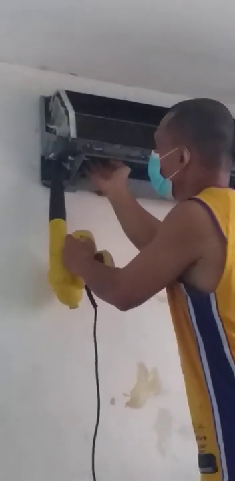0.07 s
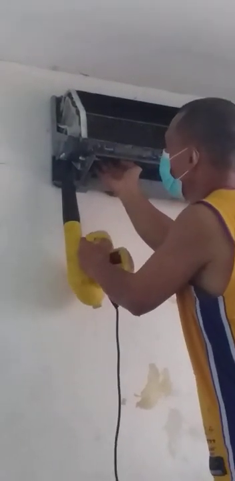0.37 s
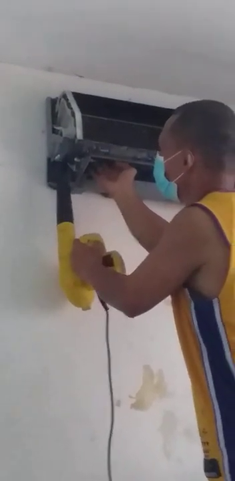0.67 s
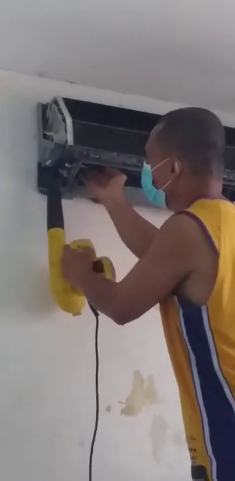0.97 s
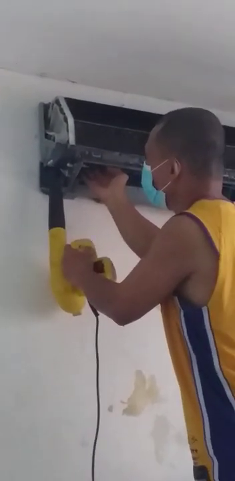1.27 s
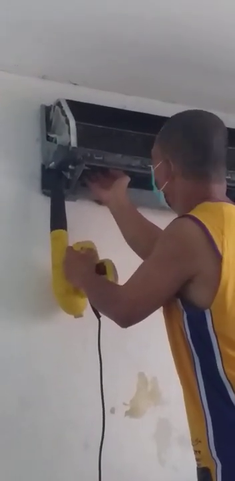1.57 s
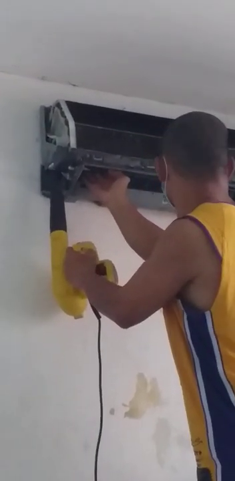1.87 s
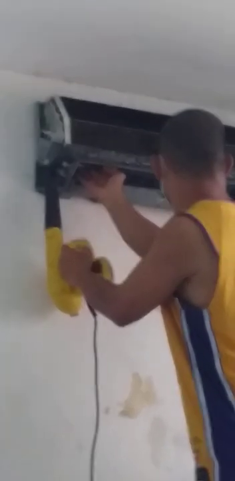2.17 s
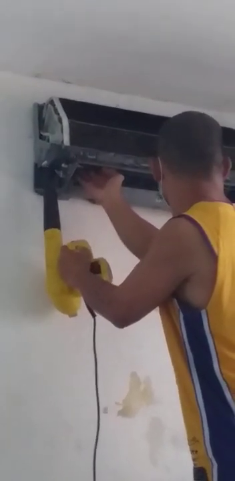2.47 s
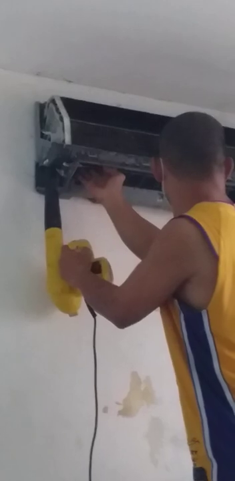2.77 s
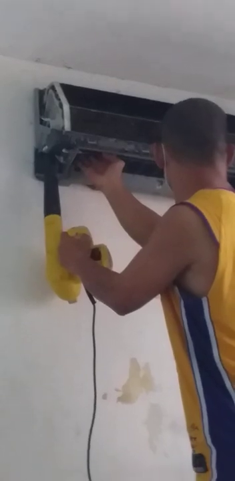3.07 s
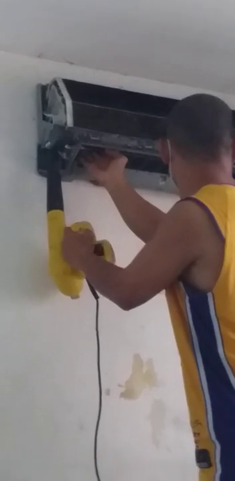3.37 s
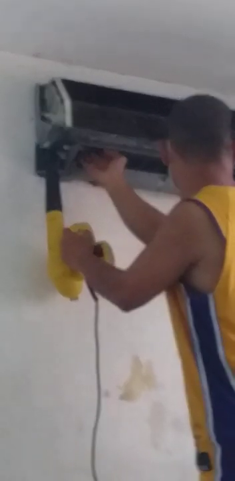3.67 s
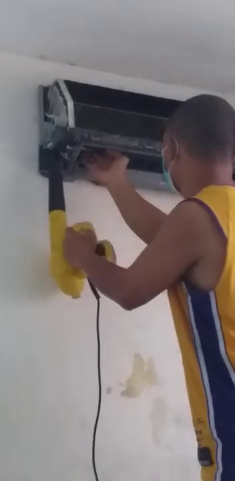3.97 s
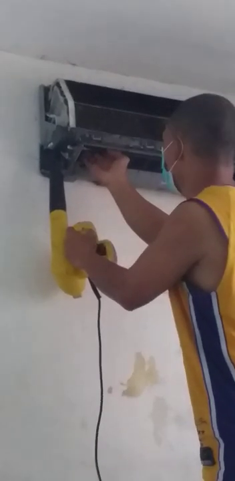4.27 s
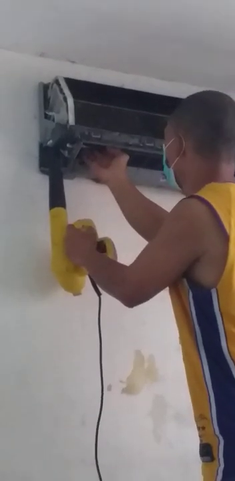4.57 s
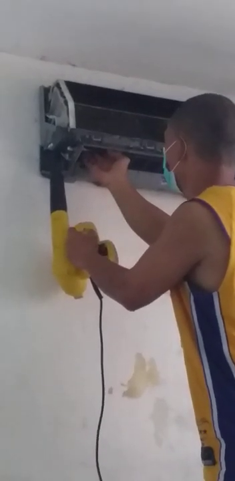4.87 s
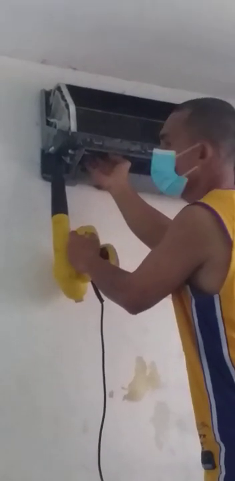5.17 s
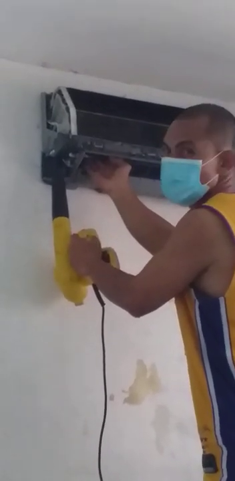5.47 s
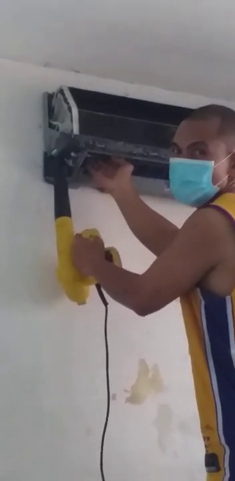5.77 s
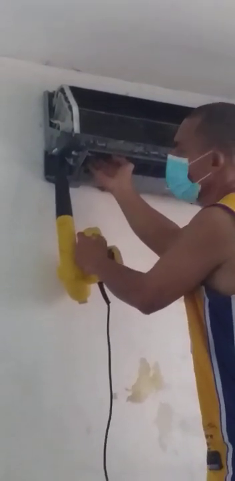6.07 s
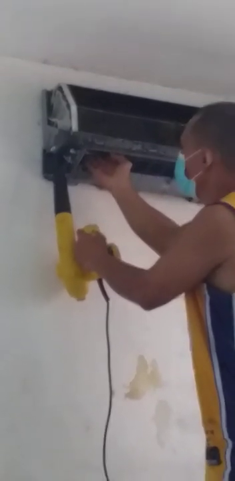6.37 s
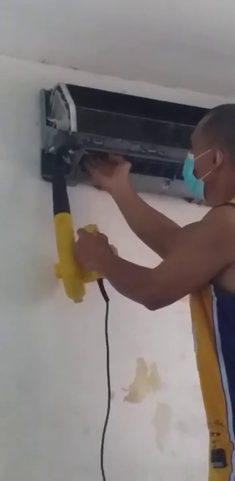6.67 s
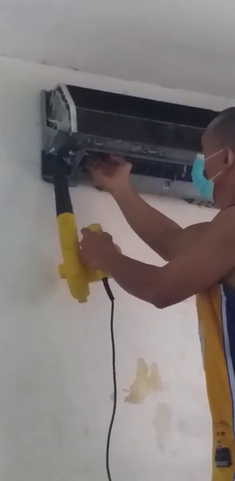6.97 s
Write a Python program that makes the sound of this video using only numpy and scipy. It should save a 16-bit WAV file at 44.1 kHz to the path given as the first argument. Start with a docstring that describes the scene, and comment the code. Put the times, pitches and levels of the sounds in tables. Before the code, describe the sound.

A high, piercing whistle and a steady rush of air come from an electric blower held against an air conditioner indoors, heard from nearby. The motor settles at full speed in the first two seconds. The whistle then dips and flares unevenly while the roar and hiss carry on. Near the end the whistle strengthens, the motor sags a little, and the air jet squeals twice in quick succession.

```python
"""A corded electric blower runs with its nozzle held up to a wall air conditioner in a small bare room.
From the start air roars through the housing and hisses on the casing, and three close cavity whistles
beat into a shrill whine. In the first two seconds the motor settles at full speed, its ten-blade
impeller singing at the blade rate. Midway the top whistle sinks and lurches, then it comes back strong.
At the end the motor sags under load, and the jet catches an edge and squeals twice."""
import sys
import numpy as np
from scipy import signal
from scipy.fft import rfft, irfft, next_fast_len
from scipy.io import wavfile
from scipy.ndimage import uniform_filter1d

SR = 44100
rng = np.random.default_rng(int(sys.argv[2]) if len(sys.argv) > 2 else 0)


def transcribe(signal):
    """Save signal, clipped to [-1, 1], as a 16-bit WAV file at the path in sys.argv[1]."""
    frames = np.atleast_2d(signal).T
    limited = np.clip(frames, -1, 1)
    pcm = np.round(limited * 32767).astype(np.int16)
    wavfile.write(sys.argv[1], SR, pcm)


N = 314433
TIME = np.arange(N) / SR


def amp(db):
    """Decibels to gain."""
    return 10 ** (np.asarray(db) / 20)


def unit(x):
    """Scales to an rms of one."""
    return x / np.sqrt(np.mean(abs(x) ** 2) + 1e-20)


def curve(rows, column=1):
    """An automation lane: one column of a timed table at every sample."""
    rows = np.asarray(rows)
    return np.interp(TIME, rows[:, 0], rows[:, column])


def bump(at_s, half_width_s):
    """A bell-shaped envelope of height one."""
    return np.exp(-((TIME - at_s) / half_width_s) ** 2)


def wander(rate_hz):
    """A slow random modulator: complex, of unit rms, rolling off above the given rate."""
    size = next_fast_len(N)
    hz = np.fft.rfftfreq(size, 1 / SR)
    white = rfft(rng.standard_normal((2, size)))
    real, imag = irfft(white / (1 + (hz / rate_hz) ** 2), size)[:, :N]
    return unit(real + 1j * imag)


def tone(hz, level_db, flutter, flutter_hz):
    """A sine whose level and phase are shaken by turbulence and shifting reflections."""
    carrier = np.exp(2j * np.pi * np.cumsum(hz) / SR)
    shaken = carrier * (1 + flutter * wander(flutter_hz))
    return amp(level_db) * unit(shaken.real)


# resonances of housing, nozzle tube and room (centre [Hz], width [Hz], lift [dB])
BODY_RESONANCES = [(170, 25, 8.5), (224, 13, 6.5), (273, 9, -3), (387, 24, -5.5), (438.7, 22, 11.5),
                   (472, 16, -1), (497.4, 25, 7), (703, 9, 7), (970, 39, 7.5), (1007, 38, 2.5),
                   (1065, 36, 5.5), (1120, 66, 6.5), (1347, 30, 6), (1660, 27, 2.5), (3450, 70, 0),
                   (3520, 33, 3), (3700, 220, 2.5), (5120, 98, 5.5)]


def turbulence(spectrum, ripple_db):
    """Noise of unit rms, coloured by the resonances and the fine ripple of the room's reflections."""
    size = next_fast_len(N)
    hz = np.fft.rfftfreq(size, 1 / SR)
    points_hz, points_db = np.transpose(spectrum)
    eq_db = np.interp(np.log(hz + 1), np.log(points_hz), points_db, left=-90)
    for centre, width, lift in BODY_RESONANCES:
        eq_db += lift / (1 + (2 * (hz - centre) / width) ** 2) ** 1.8
    ripple_hz = np.arange(0, SR / 2, 9)
    ripple = unit(np.interp(hz, ripple_hz, rng.standard_normal(len(ripple_hz))))
    white = rfft(rng.standard_normal(size))
    return unit(irfft(white * amp(eq_db + ripple_db * ripple), size)[:N])


# EQ curves of the four air layers (frequency [Hz], relative level [dB])
RUMBLE_EQ = [(8, -80), (30, -48), (55, -31), (110, -24.5), (200, -16.5), (245, -11), (300, 1.5), (380, 2.5),
             (560, -8), (650, -2.5), (750, -2.5), (1100, -12.5), (2000, -40)]
ROAR_EQ = [(300, -50), (700, -7.5), (1000, 0.5), (1500, -2), (2400, -2), (3000, -2), (4500, -19),
           (8000, -43)]
RUSH_EQ = [(2000, -72), (2700, -11), (3100, -5), (3420, 1), (3750, -3.5), (4200, -4), (5000, -22),
           (7000, -44)]
HISS_EQ = [(2500, -32), (4500, 1.5), (5200, 2), (6200, 0), (7500, 0.3), (8000, -5), (8600, -15.5),
           (9200, -17.5), (10200, -15.5), (12700, -14), (13400, -12.5), (14800, -13.5), (15700, -13)]
# fader of the housing's rumble (time [s], level [dB])
RUMBLE_FADER = [(0, -26.5), (.4, -31), (.85, -28.5), (1.8, -28.7), (4.3, -27.5), (6.6, -28), (7.13, -28.5)]
# swells as the nozzle shifts on the casing, scaled per layer (time [s], half width [s], base lift [dB])
NOZZLE_SWELLS = [(.38, 0.31, 2), (6.57, 0.31, 1.5)]


def air():
    """The bed: rumble in the housing, roar of the jet, rush around the whistles, hiss on the casing."""
    swell_db = sum(lift_db * bump(at_s, half_width_s) for at_s, half_width_s, lift_db in NOZZLE_SWELLS)
    creep_db = 0.274 * TIME  # the air grows slowly louder on the casing
    rumble = amp(curve(RUMBLE_FADER)) * turbulence(RUMBLE_EQ, ripple_db=1.76)
    roar = amp(-22.5 + 1.25 * swell_db + 0.7 * creep_db) * turbulence(ROAR_EQ, ripple_db=1.36)
    rush = amp(-20 + 1.6 * swell_db + 0.84 * creep_db) * turbulence(RUSH_EQ, ripple_db=0.2)
    hiss = amp(-22 + 0.52 * swell_db + creep_db) * turbulence(HISS_EQ, ripple_db=1.5)
    gusts = amp(0.36 * wander(rate_hz=8.3).real)
    return rumble + gusts * (roar + rush + hiss)


START_HZ, FULL_HZ, RUN_UP_S = 2612, 2754, .62
SAG_HZ, SAG_AT_S, SAG_GROWTH_S = 32, 7.1, .42


def blade_rate():
    """Blades passing the outlet per second: the motor runs up, holds, and sags under load."""
    run_up = (FULL_HZ - START_HZ) * np.exp(-TIME / RUN_UP_S)
    sag = SAG_HZ * np.exp((TIME - SAG_AT_S) / SAG_GROWTH_S)
    return FULL_HZ - run_up - sag


BLADES = 10
REFLECTION, NULL_HZ, NULL_SPACING_HZ = .65, 2742, 25.6
# fader of the blade tone as the blower is turned, ahead of the room (time [s], level [dB])
BLADE_FADER = [(0, -23), (.2, -26.5), (.38, -34), (.6, -28), (1.1, -26.5), (2.1, -23.5), (3.5, -30),
               (5.3, -28), (6.8, -28.5), (7.13, -22.5)]
# shaft hum and the blade tone's octave (pitch [multiple of shaft speed], level [dB])
SHAFT_TONES = [(1, -39), (20, -37.5)]


def motor(blade_hz):
    """Shaft tones and the blade tone, which fades in and out as it glides through a reflection's nulls."""
    room_comb = abs(1 - REFLECTION * np.exp(2j * np.pi * (blade_hz - NULL_HZ) / NULL_SPACING_HZ))
    out = room_comb * tone(blade_hz, curve(BLADE_FADER), flutter=0.14, flutter_hz=30)
    for multiple, level_db in SHAFT_TONES:
        out += tone(blade_hz * multiple / BLADES, level_db, flutter=0.64, flutter_hz=2.7)
    return out


# accents of the jet on an edge (time [s], pitch [Hz], level [dB])
EDGE_SQUEALS = [(7.014, 3574, -5), (7.112, 3514, -7.5)]


def squeals(half_width_s=0.021, fall_hz_per_s=350):
    """The jet catches an edge of the casing and gives short, falling squeals."""
    out = np.zeros(N)
    for at_s, hz, level_db in EDGE_SQUEALS:
        glide_hz = hz - fall_hz_per_s * (TIME - at_s)
        out += bump(at_s, half_width_s) * tone(glide_hz, level_db, flutter=0.32, flutter_hz=30.3)
    return out


LOCK_DB = -20  # level at which a whistle starts to lock on to its pitch


def whistle(hz, level_db, blade_hz, flutter, first_db, second_db, octave_db):
    """A cavity tone and its octave; the blades chop it, adding sidebands one and two blade rates up."""
    looseness = amp(.5 * (LOCK_DB - level_db))  # a weak whistle flutters, a strong one holds steady
    out = tone(hz, level_db, flutter * looseness, flutter_hz=18)
    out += tone(hz + blade_hz, first_db, flutter=0.24, flutter_hz=6.5)
    out += tone(hz + 2 * blade_hz, second_db, flutter=.45, flutter_hz=5)
    return out + tone(2 * hz, level_db + octave_db, flutter=.6, flutter_hz=10)


TOP_HZ, MIDDLE_HZ, LOW_HZ = 3382, 3305, 3184
TAKEOVER = 0.25  # dB the middle whistle gains for each dB the top one swings down
# whistle faders (time [s], level [dB])
TOP_FADER = [(0, -19), (.04, -8.5), (.42, -17.5), (.62, -13), (1.9, -11.5), (2.45, -12), (2.58, -18.5),
             (4.4, -19.5), (5.45, -16.5), (6.0, -21), (6.3, -19), (6.8, -11), (7.13, -15)]  # follows the aim of the nozzle
MIDDLE_FADER = [(0, -45), (.8, -22), (1.35, -28), (2.0, -22), (3.3, -20.5), (4.4, -19.5), (5.8, -30),
                (6.4, -27), (7.13, -29)]  # strongest while the top one is weak
LOW_FADER = [(0, -28), (1.3, -21.5), (2.3, -21), (3.0, -27), (4.7, -19.5), (5.7, -28.5), (6.3, -21.5),
             (7.13, -23)]
# the top whistle suddenly drops out or flares up (time [s], level change [dB])
TOP_LURCHES = [(2.1, -10), (2.195, -5), (2.245, 2), (2.335, -15), (2.87, 3), (3.155, 8.5), (3.46, 6),
               (3.55, 4), (3.725, 8), (3.88, 7.5), (3.98, 6), (4.74, 6)]
# first sidebands of the blade chop (time [s], top whistle's sideband [dB], low whistle's sideband [dB])
FIRST_SIDEBANDS = [(0, -35, -42), (.45, -29, -41), (.78, -41, -27), (1.2, -36, -35), (1.55, -29, -34),
                   (1.9, -34.5, -34), (5.4, -30.5, -31), (7.13, -35, -37)]
# second sideband of the top whistle (time [s], level [dB])
SECOND_SIDEBAND = [(0, -57), (.35, -43), (.75, -51), (7.13, -45)]


def whine(blade_hz):
    """The lead sound: three close cavity whistles share the jet and beat into a rough shriek."""
    pull = (blade_hz / FULL_HZ) ** .17  # the flow bends the cavity's pitch a little
    drift_hz = 3 * wander(rate_hz=1.5).real
    top_db = curve(TOP_FADER)
    looseness = np.minimum(amp(LOCK_DB - top_db), 1) ** 2
    swing_db = 2 * looseness * unit(wander(rate_hz=10).real)  # top and middle trade strength at random
    swing_db += sum(change_db * bump(at_s, half_width_s=0.023) for at_s, change_db in TOP_LURCHES)
    middle_db = curve(MIDDLE_FADER) - TAKEOVER * swing_db
    top = whistle(TOP_HZ * pull + looseness * drift_hz, top_db + swing_db, blade_hz, flutter=.2,
                  first_db=curve(FIRST_SIDEBANDS), second_db=curve(SECOND_SIDEBAND), octave_db=-31)
    middle = whistle(MIDDLE_HZ * pull + drift_hz, middle_db, blade_hz, flutter=.5,
                     first_db=-56, second_db=-58, octave_db=-24)
    low = whistle(LOW_HZ * pull + drift_hz, curve(LOW_FADER), blade_hz, flutter=.5,
                  first_db=curve(FIRST_SIDEBANDS, column=2), second_db=-56, octave_db=-31)
    return top + middle + low


def scene():
    """The blower, panned dead centre."""
    blade_hz = blade_rate()
    blower = motor(blade_hz) + whine(blade_hz) + squeals() + air()
    return np.array([blower, blower])


def limiter(x, threshold_db):
    """Ducks the whole mix while its short-term level is over the threshold."""
    power = uniform_filter1d((x ** 2).mean(axis=0), size=900)
    over_db = np.maximum(10 * np.log10(abs(power) + 1e-12) - threshold_db, 0)
    return x / amp(uniform_filter1d(over_db, size=400))


def record(dry):
    """The master chain: a limiter, clipping of the rare highest peaks, then a steep low-pass."""
    held = np.clip(limiter(dry, threshold_db=-8.5), -1, 1)
    low_pass = signal.firwin(1501, cutoff=15780, window=("kaiser", 9), fs=SR)
    return signal.oaconvolve(held, low_pass[None], "same")


dry = scene()
out = record(dry)
transcribe(out)
```